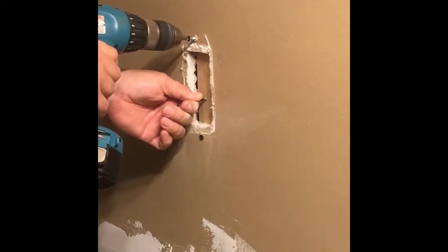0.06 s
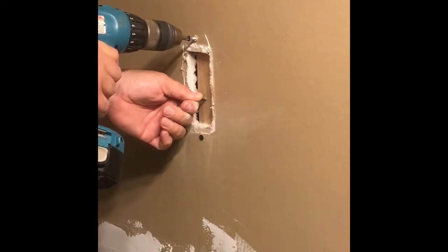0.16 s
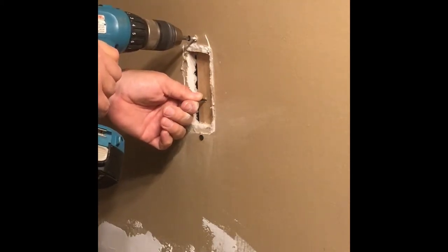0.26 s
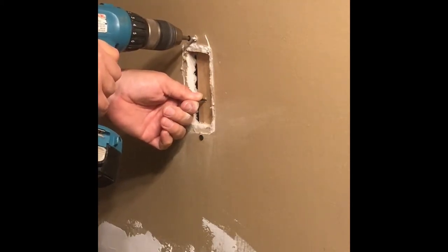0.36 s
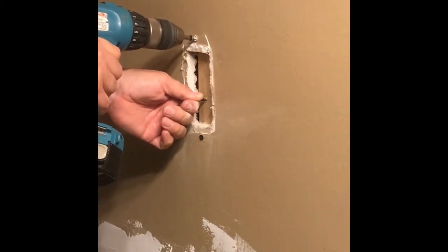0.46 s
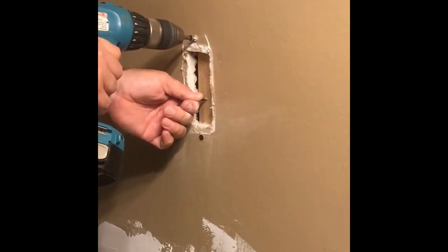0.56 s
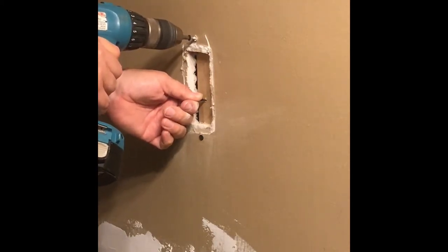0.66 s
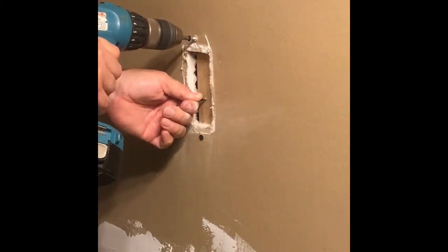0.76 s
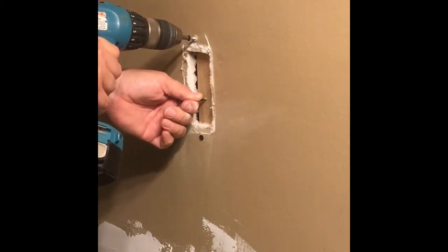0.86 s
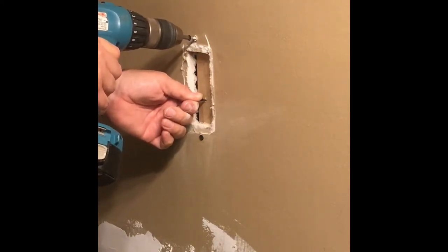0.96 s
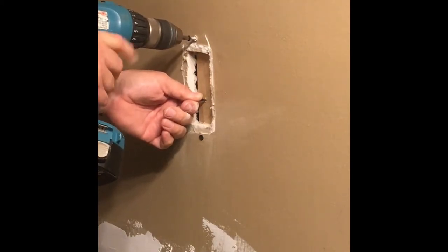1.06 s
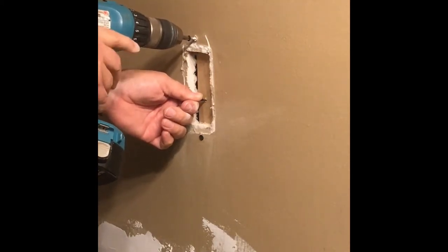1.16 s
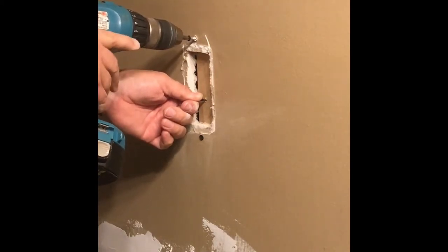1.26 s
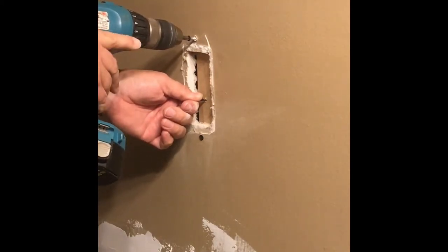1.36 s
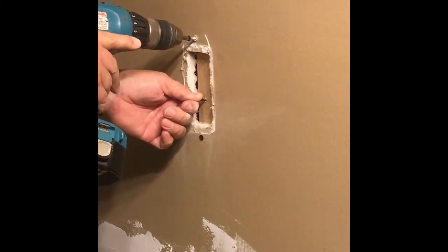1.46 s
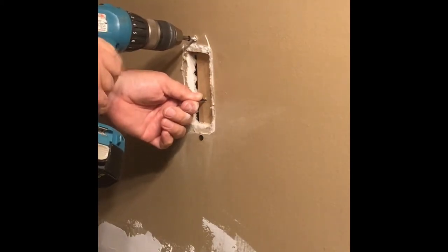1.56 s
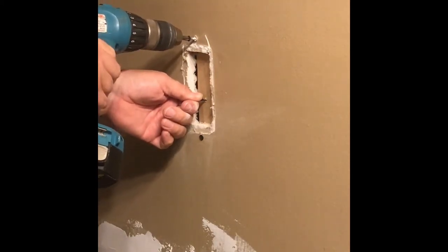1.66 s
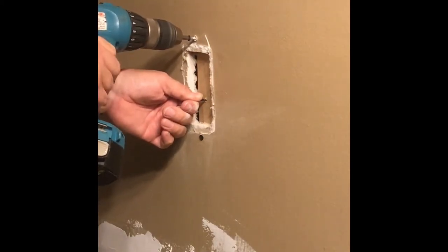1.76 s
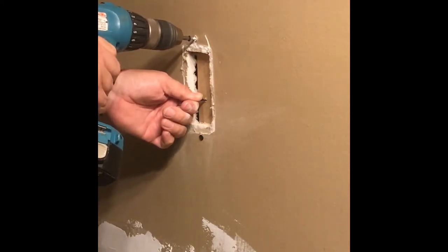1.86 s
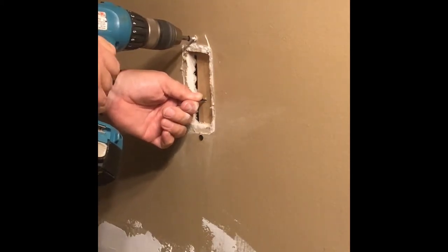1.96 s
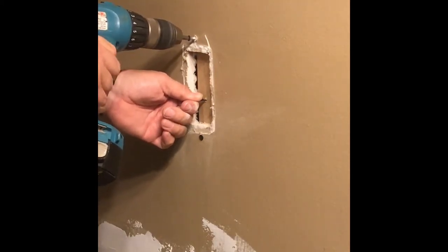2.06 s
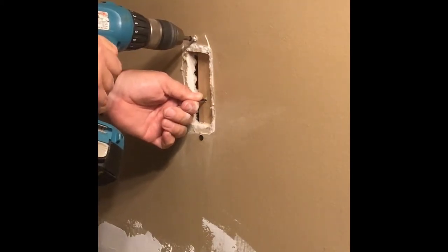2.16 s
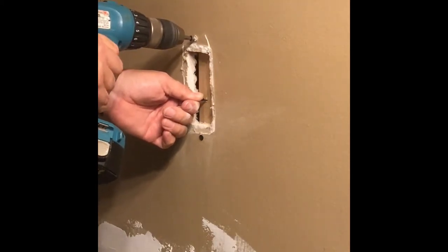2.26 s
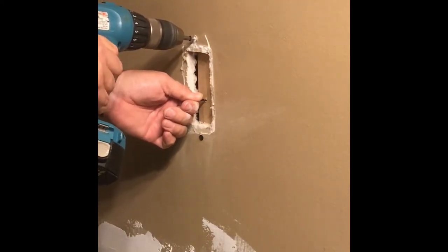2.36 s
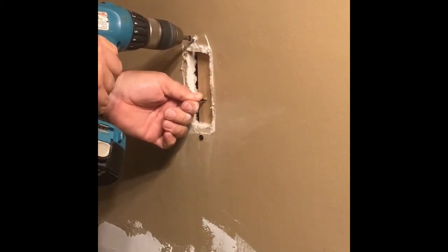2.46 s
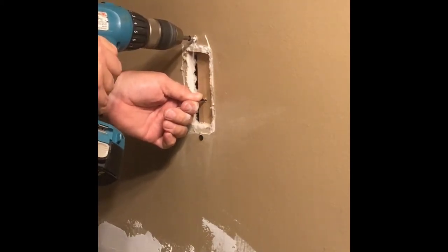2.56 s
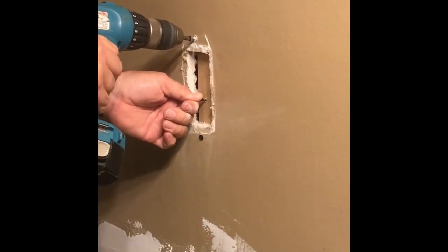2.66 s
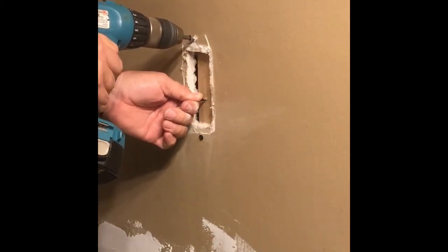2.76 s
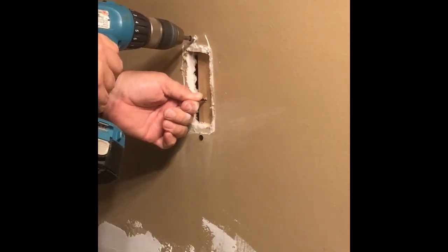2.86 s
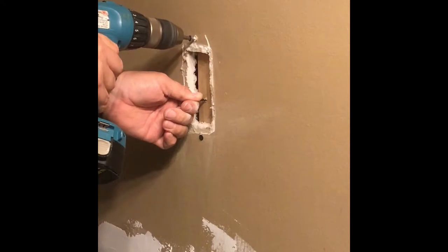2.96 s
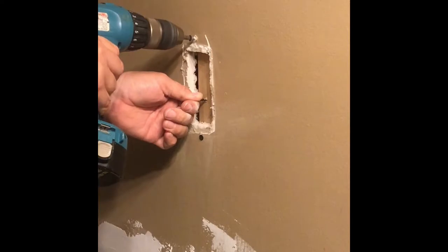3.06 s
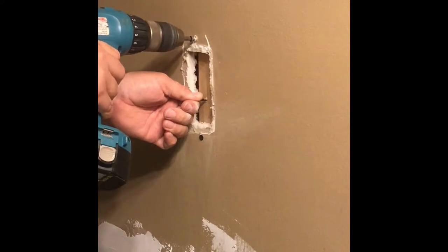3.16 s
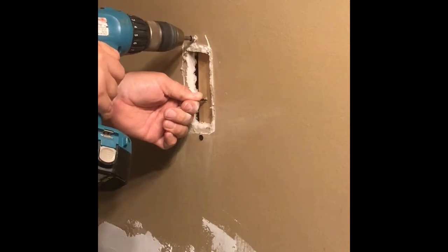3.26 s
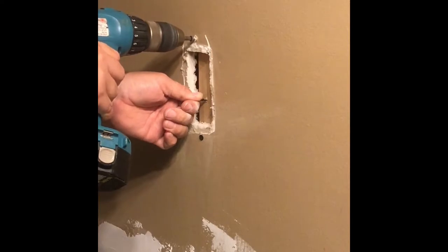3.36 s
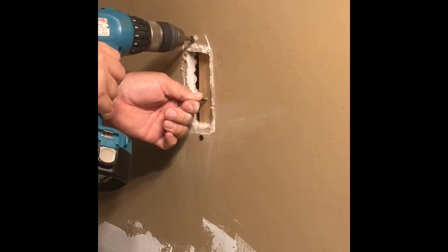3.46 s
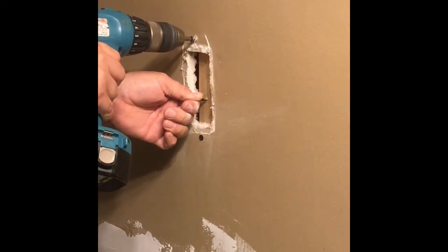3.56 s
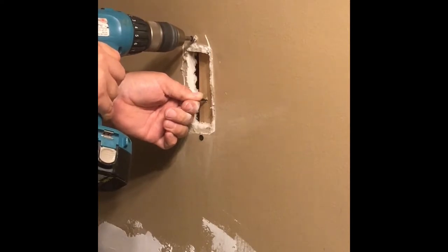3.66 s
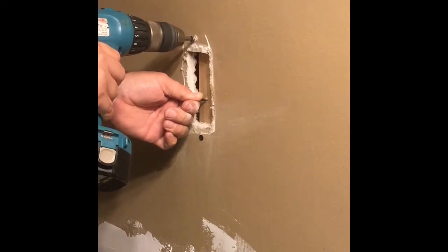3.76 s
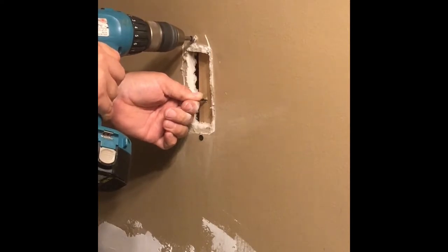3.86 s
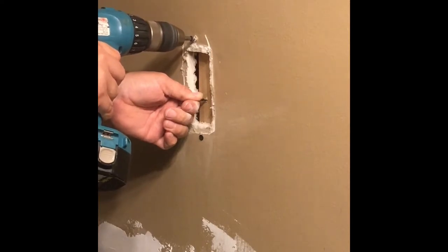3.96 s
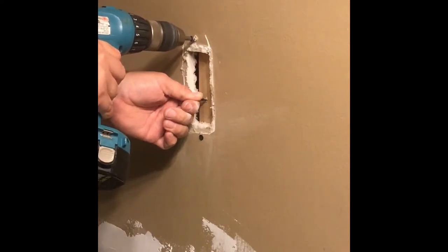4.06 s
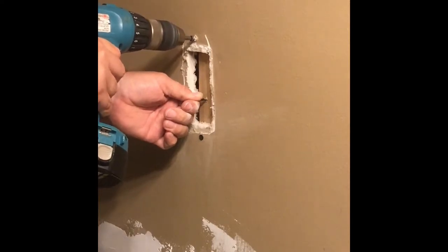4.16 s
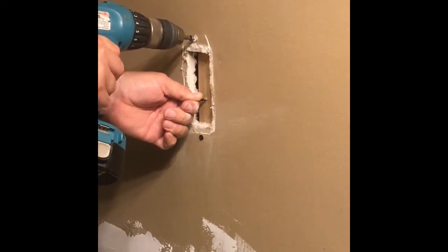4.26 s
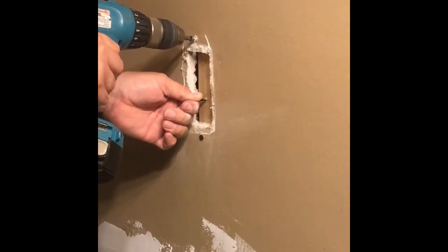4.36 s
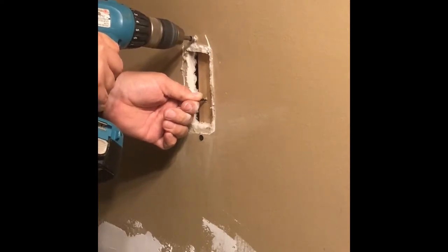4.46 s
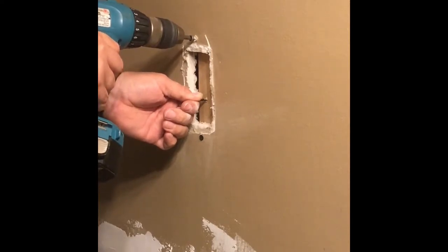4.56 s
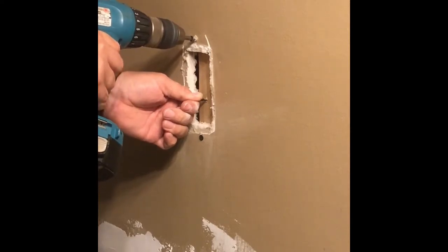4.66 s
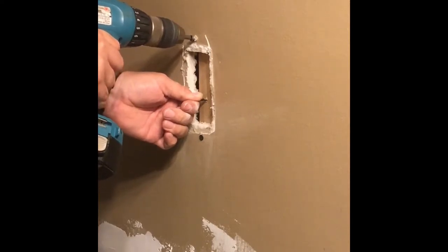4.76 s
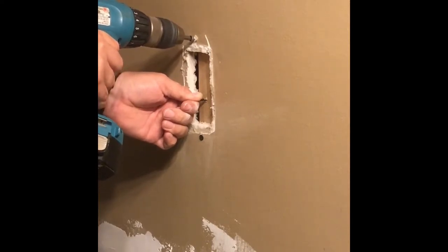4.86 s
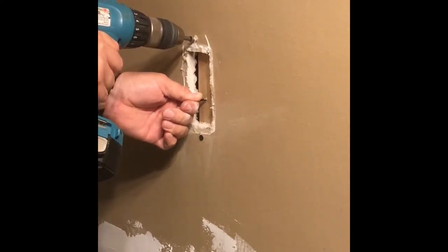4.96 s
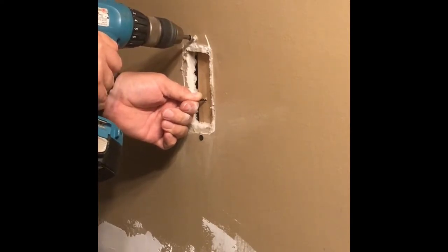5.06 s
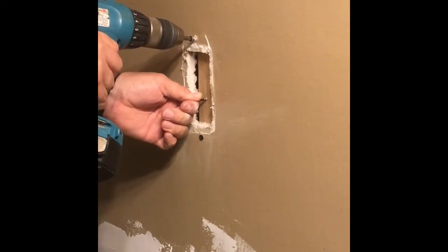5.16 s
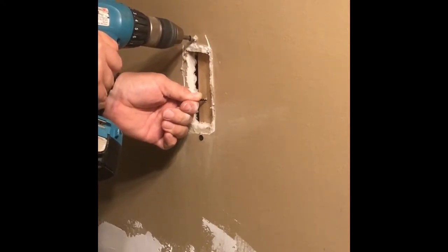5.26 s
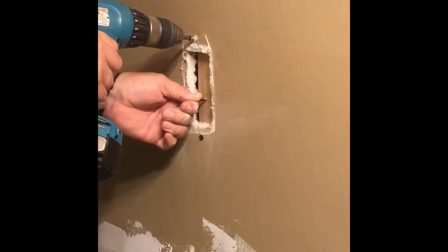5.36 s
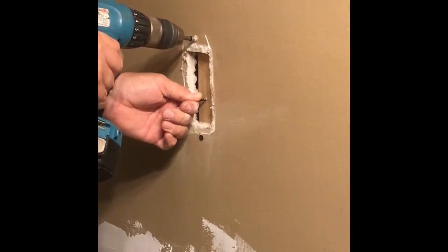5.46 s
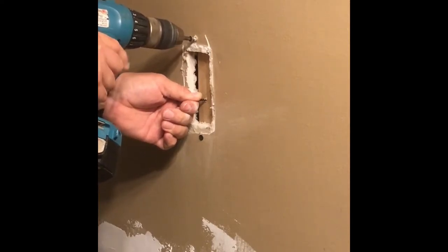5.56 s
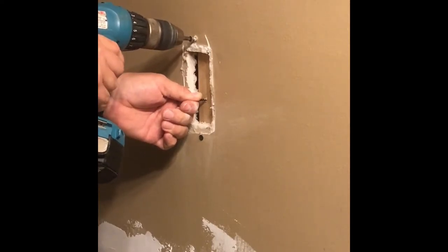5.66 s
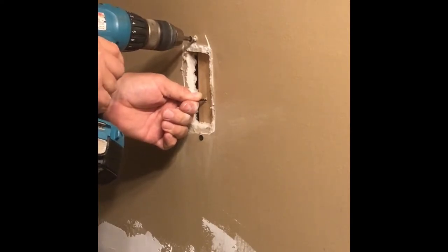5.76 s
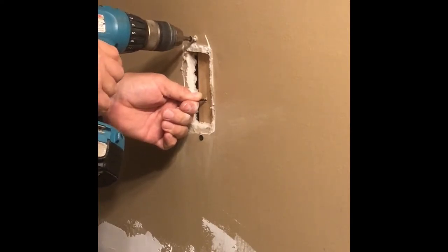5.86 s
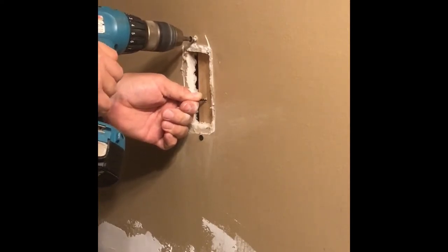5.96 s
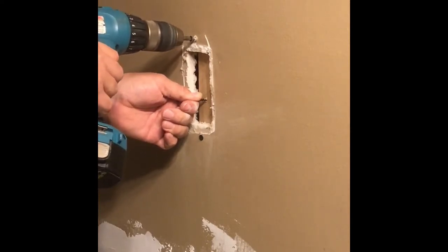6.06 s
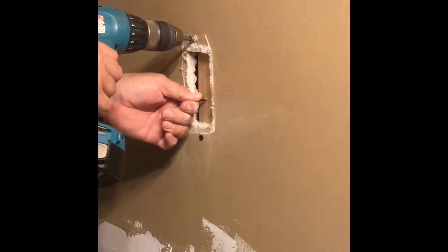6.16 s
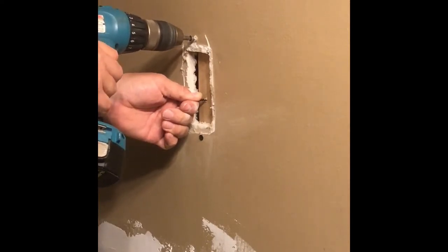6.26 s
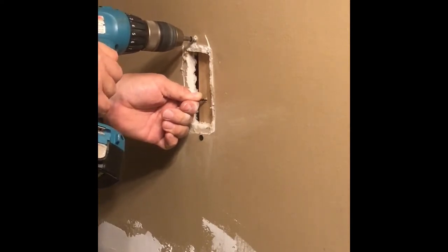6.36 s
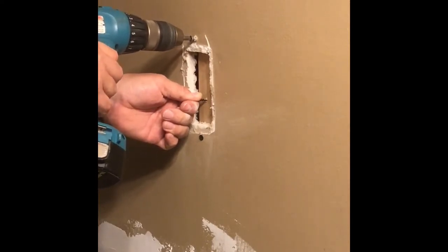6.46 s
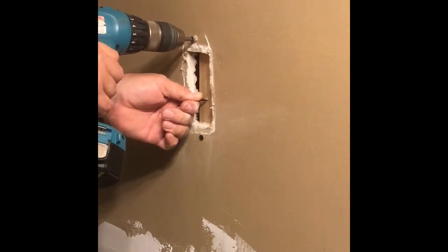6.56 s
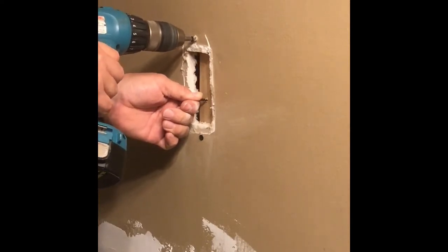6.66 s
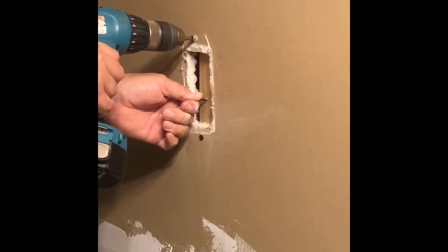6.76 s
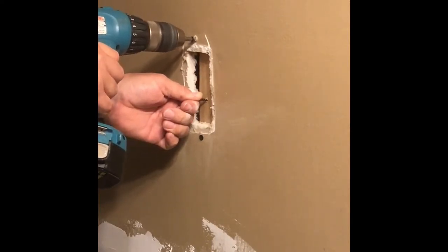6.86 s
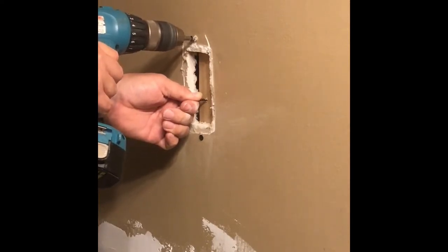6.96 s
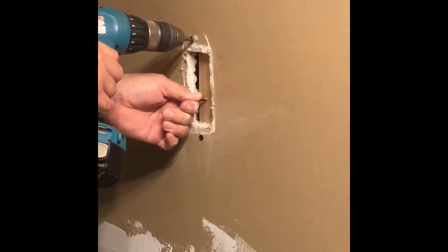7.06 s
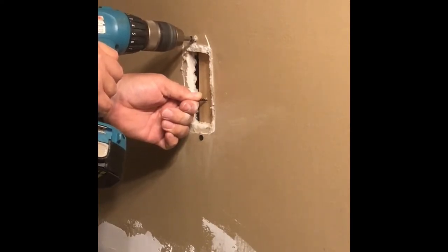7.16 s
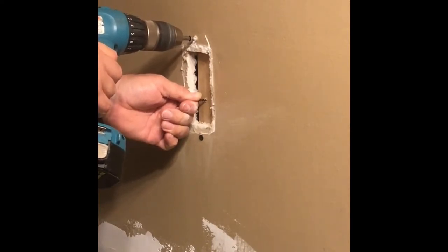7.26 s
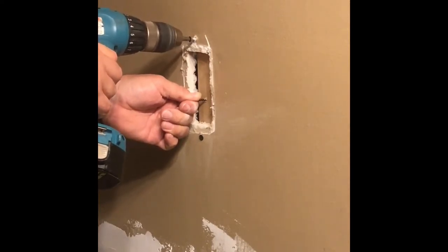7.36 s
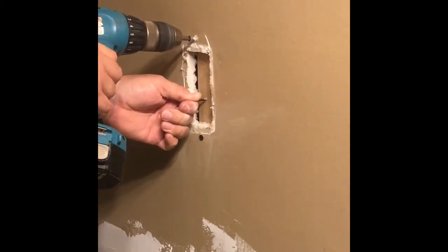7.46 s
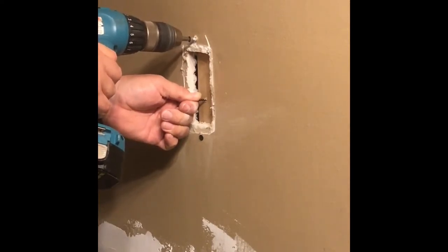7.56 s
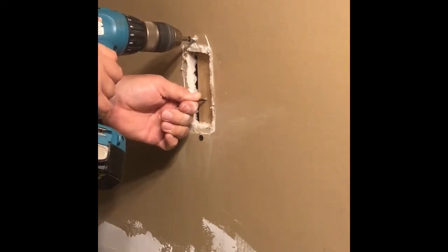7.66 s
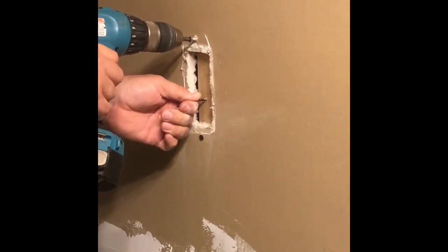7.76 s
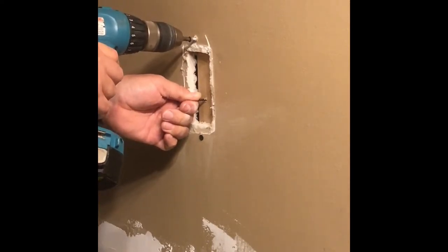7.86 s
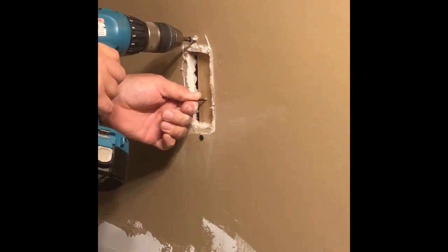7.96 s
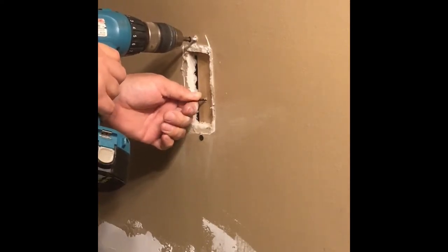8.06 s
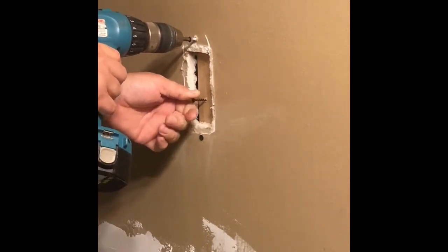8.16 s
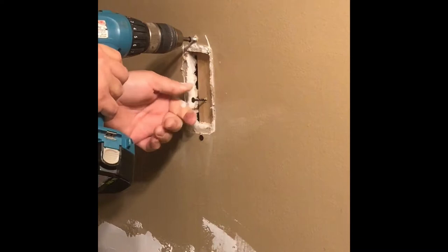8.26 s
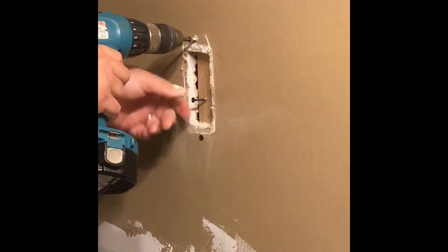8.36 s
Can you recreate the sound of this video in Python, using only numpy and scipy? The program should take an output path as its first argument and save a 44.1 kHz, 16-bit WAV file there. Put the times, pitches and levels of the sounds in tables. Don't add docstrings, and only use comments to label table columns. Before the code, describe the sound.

A cordless drill whines in three runs against a hollow plasterboard wall in a small tiled bathroom, with sharp switch clacks and panel thumps between.

```python
import sys
import numpy as np
from scipy import signal
from scipy.fft import rfft, irfft, next_fast_len
from scipy.io import wavfile
from scipy.ndimage import map_coordinates

SR = 44100
rng = np.random.default_rng(int(sys.argv[2]) if len(sys.argv) > 2 else 0)


def volts_from_db(level):
    exponent = np.asarray(level, float) / 20
    return 10 ** exponent


def store_wav(level_fs):
    pcm = np.round(np.clip(np.atleast_2d(level_fs), -1, 1) * 32767)
    wavfile.write(sys.argv[1], SR, pcm.T.astype(np.int16))


N = 370881

# freq_hz, level_db (per Hz)
AIR_COLOUR = [(12, -38.5), (20, -4), (44, -3), (68, 4), (162, -18), (276, -14.5), (539, -20.5), (891, -27),
              (1180, -22.5), (1890, -28.5), (5620, -34.5), (7440, -40.5), (15800, -42)]
# freq_hz, t60_s
ROOM_DECAY = [(100, 0.22), (1000, 0.37), (4000, 0.31), (10000, 0.26), (16000, 0.14)]
# start_s, low_hz
FLECKS = [(.641, 4700), (.641, 9000), (.92, 5100), (1.942, 14400), (2.545, 11700), (2.847, 7600),
          (3.706, 9600), (3.708, 4100), (3.937, 4100), (3.939, 8300), (3.939, 9600), (4.566, 7500),
          (4.659, 5600), (4.659, 8300), (4.937, 7500), (4.939, 5100), (6.795, 8200), (6.843, 8200),
          (6.957, 9000), (7.213, 4700), (7.214, 9600), (7.584, 4100), (7.586, 8200)]
FLECK_DB, FLECK_DB_PER_DECADE, FLECK_WIDTH_HZ = -42.5, -19, 1400

# start_s, length_s,
# boom_db, rumble_db
SHOVES = [(0, 0.023, -39.5, -49.5), (0.512, 0.054, -40, -38), (0.667, 0.18, -41.5, -52),
          (1.09, .12, -45, -50.5), (1.424, 0.056, -44, -56.5), (1.958, 0.35, -36, -40.5),
          (2.384, 0.42, -43.5, -44), (2.822, 0.29, -38.5, -43), (3.076, 0.25, -33.5, -40),
          (3.504, 0.26, -38, -45.5), (3.964, 0.51, -40, -43), (4.5, .28, -34.5, -40.5),
          (4.832, 0.23, -37.5, -36.5), (5.122, 0.33, -33, -35.5), (5.53, 0.079, -34.5, -39.5),
          (6.051, .1, -43, -52), (6.27, 0.41, -33, -40.5), (6.817, 0.24, -38.5, -38),
          (7.098, .5, -43.5, -43.5), (7.653, 0.25, -42.5, -43), (8.1, 0.33, -61, -60), (.2, 0.6, -71, -66),
          (1.72, 0.18, -56, -55.5), (5.8, 0.18, -61, -68.5)]
# freq_hz, level_db (per Hz)
RUMBLE_COLOUR = [(20, -19), (40, -5.5), (85, -7), (97, -4), (199, -5), (242, -12.5), (340, -11.5),
                 (450, -28.5), (700, -55.5)]
PANEL_MODES_HZ = [100.4, 134, 167.7, 197, 273]
MODE_WIDTH_HZ, MODE_LIFT = 13, 0.7
PANEL_HZ, PANEL_RISE_S, PANEL_T60_S = 68.4, 0.045, 0.45
RUMBLE_T60_S, THREAD_DB = 0.53, -17.5

# start_s, peak_db, length_s,
# centre_hz, width_hz
TICKS = [(.248, -49, .006, 1300, 1480), (.249, -72, 0.0043, 5250, 1500), (0.386, -39.5, 0.025, 1800, 2500),
         (.386, -36.5, 0.0026, 6250, 6048), (1.129, -29.5, .012, 2150, 2510),
         (1.313, -19.5, 0.0037, 3500, 8000), (1.408, -23, .006, 3260, 1200), (3.44, -36, 0.0066, 8000, 500),
         (1.629, -61, 0.00464, 5000, 6200), (1.704, -56, 0.0037, 1800, 892),
         (1.711, -57, 0.0032, 2900, 703), (1.72, -42.5, 0.0122, 1502, 700), (1.744, -45, .01, 1599, 800),
         (1.77, -61, 0.0048, 3000, 6010), (5.548, -22, 0.017, 1580, 2940),
         (6.033, -49.5, 0.016, 2014, 8940), (6.072, -48, 0.0044, 3993, 6000),
         (7.833, -21.5, 0.014, 1240, 2380), (8.187, -51, 0.0017, 5740, 897),
         (8.146, -60, 0.0015, 4500, 3000), (8.188, -55, .002, 890, 1394), (8.268, -49, .003, 1100, 700),
         (8.29, -58, 0.024, 1300, 800), (8.334, -61.5, 0.0051, 1210, 297)]
# start_s, peak_db, top_hz
CLACKS = [
    (1.3133, -19.5, 22000),
    (1.4086, -17.5, 4500),
]
# delay_s, level_db
CHATTER = [
    (0, 2.5),
    (.0006, 6),
    (.0015, -7),
    (.005, -6),
]
# freq_hz, width_hz, level_db
HOUSING = [(607, 500, -25), (1700, 360, -2), (2450, 700, -8), (3190, 530, 3), (4400, 520, 4.5),
           (5300, 950, -2.5), (6660, 1400, -2.5), (8500, 1180, -9.5), (11800, 1500, -23), (14000, 1400, -7)]
CLACK_LOW_HZ = 1300

# time_s, asked_speed_hz
PULLS = [
    [(.385, 40), (.418, 30), (.422, 178), (.58, 153), (.72, 149), (.86, 45), (1.04, 130), (1.075, 107),
     (1.135, 108)],
    [(1.774, 130), (1.81, 228), (1.9, 205), (2.3, 205.4), (3.15, 205.2), (3.33, 203.6), (4.4, 203.1),
     (4.75, 202.3), (5.56, 202.5)],
    [(6.058, 285), (6.13, 205), (6.4, 202.2), (6.9, 202.3), (7.4, 203.4), (7.838, 204)],
]
# time_s, screw_load (0 to 1), vent_tilt (-1 to 1, toward the microphone)
HAND = [(.6, 0, 0), (1.1, 0, 0), (2.12, 0.66, -0.43), (2.6, 0.06, .3), (3.1, 0, 0.095), (3.3, 0.7, -0.75),
        (3.65, .7, 0.25), (4.0, 0.84, 1), (4.35, 0.8, 0.94), (4.7, 0.38, 0.24), (5.05, 0.6, -1),
        (5.4, 0.5, 0.077), (6.4, 1, -0.1), (6.85, 0.94, -0.76), (7.1, 1, 0.16), (7.35, 1, 0.16),
        (7.7, 0.83, 0.098)]
MAIN_ORDERS = [7, 10.39, 20.16, 26, 28, 30.3, 35]
# part_throttle_db, full_speed_db, db_per_load, db_per_tilt
MAIN_LEVELS = [(-48, -52, 11.5, -0.9), (-44, -44.5, 0, -7.5), (-43.5, -64, 17, -3),
               (-56.5, -46.5, -2.5, 6.5), (-60, -48.5, 5, 4), (-47, -59, .1, -0.5), (-51, -47.5, 3, .1)]
# multiple, level_db
MINOR_ORDERS = [(8, -56), (10.76, -52), (11.03, -53), (14, -49), (16, -54), (18, -55), (21, -51), (23, -56),
                (25, -54), (29, -51), (30, -56), (36, -54), (40, -62), (43, -64), (48, -62), (49, -59),
                (53, -65), (56, -62), (57, -63), (61, -64), (64, -61), (65, -61), (69, -61), (70, -60),
                (77, -59)]
# freq_hz, level_db (per Hz)
WHIRR_COLOUR = [(210, -57), (350, -21.5), (433, -12.5), (810, -15), (1050, -5.5), (1330, -7), (1390, -5),
                (1880, -8.5), (2160, -2), (2640, -4.5), (2880, -1), (4870, -4.5), (5460, -3), (7050, -5.5),
                (10500, -15.5), (13600, -35), (22000, -120)]
# freq_hz, level_db (per Hz)
HISS_COLOUR = [(7000, -33), (9500, -3), (10600, -13), (12000, 0.5), (14200, -5), (15300, 4.5), (15800, -9)]
# freq_hz, level_db (per Hz)
GROWL_COLOUR = [(200, -16), (450, -9.5), (1200, -1.5), (1800, -0.5), (3500, -37)]
SPIN_UP_S, FULL_HZ = .08, 203
GEARS_SETTLE_HZ = 165
WHIRR_DB, WHIRR_DB_PER_DECADE = -29, 15
STRAIN_DB, LOAD_DB = 2, 0.33
HISS_DB, HISS_DB_PER_DECADE = -9, 17
DRIFT_DB, COAST_DB, SMEAR_DB = 0.8, -90, -11
VENT_HZ, VENT_DB_PER_OCTAVE = 1500, 14
NOTCH_HZ, NOTCH_WIDTH_HZ, NOTCH_DB = 1800, 170, -9


def unit(x):
    return x / np.sqrt(np.mean(x ** 2) + 1e-20)


def along(points, hz):
    f, v = np.transpose(points)
    return np.interp(np.log(hz + 1), np.log(f + 1), v)


def curves(rows):
    s, *cols = np.transpose(rows)
    return [np.interp(np.arange(N) / SR, s, c) for c in cols]


def wobble(rate):
    knots = rng.standard_normal(int(N * rate / SR) + 4)
    return map_coordinates(knots, [np.arange(N) * rate / SR])


def filtered(x, response):
    m = next_fast_len(N + SR // 2)
    return irfft(rfft(x, m) * response(np.fft.rfftfreq(m, 1 / SR)), m)[..., :N]


def noise(colour, drive=1):
    return unit(filtered(drive * rng.standard_normal(N), lambda hz: volts_from_db(along(colour, hz))))


def resonance(f, hz, width_hz):
    return 1j * f * width_hz / (hz * hz - f * f + 1j * f * width_hz)


def room_air():
    return volts_from_db(-58.5) * noise(AIR_COLOUR)


def bathroom(x, count=5):
    hz, t, z = signal.stft(rng.standard_normal((count + 1, SR // 2)), SR, nperseg=256)
    fade = volts_from_db(-60 * t / along(ROOM_DECAY, hz)[:, None])
    tails = signal.istft(z * fade, SR, nperseg=256)[1]
    place = (np.arange(N) / SR / .11 - np.arange(count)[:, None]) % count
    shares = np.sin(np.pi * np.clip(place / 2, 0, 1))
    echoes = tails[1:] / np.linalg.norm(tails[1])
    wet = signal.fftconvolve(shares * x, echoes, axes=1).sum(0)
    earlier = filtered(np.pad(tails[0], (0, N))[:N], lambda f: volts_from_db(along(WHIRR_COLOUR, f)))
    return volts_from_db(-5.5) * np.pad(wet, (150, 0))[:N] + volts_from_db(-41.5) * earlier


def treble_flecks():
    side = np.zeros(N + SR)
    f = np.fft.rfftfreq(2048, 1 / SR)
    window = signal.windows.kaiser_bessel_derived(2048, 4 * np.pi)
    for s, low in FLECKS:
        db = FLECK_DB + FLECK_DB_PER_DECADE * np.log10(low / 4500)
        inside = (f > low) * (f < low + FLECK_WIDTH_HZ)
        band = irfft(rfft(rng.standard_normal(2048)) * inside)
        side[round(s * SR) - 1024:][:2048] += volts_from_db(db) * unit(band) * window
    return side[:N] * np.array([[1], [-1]])


def swells(levels_db, t60):
    t = np.arange(N) / SR
    energy = 0
    for (s, length, *_), db in zip(SHOVES, levels_db):
        rise = np.clip((t - s) / PANEL_RISE_S + .5, 0, 1)
        ring_out = volts_from_db(-60 * np.clip(t - s - length, 0, None) / t60)
        energy = energy + (volts_from_db(db) * rise * ring_out) ** 2
    return np.sqrt(energy)


def wall():
    _, _, boom_db, rumble_db = np.transpose(SHOVES)
    boom = np.sin(2 * np.pi * np.cumsum(PANEL_HZ + 1.63 * wobble(14)) / SR)
    boom = boom * volts_from_db(2.5 + 0.8 * wobble(9)) * swells(boom_db, PANEL_T60_S)
    thread = power(.05) * volts_from_db(whirr_level() + THREAD_DB)
    bite = np.hypot(swells(rumble_db, RUMBLE_T60_S), thread)
    lumps = noise(RUMBLE_COLOUR, volts_from_db(1.9 * wobble(60) + 2.1 * wobble(12)))

    def panel(f):
        return 1 + MODE_LIFT * sum(resonance(f, hz, MODE_WIDTH_HZ) for hz in PANEL_MODES_HZ)

    return boom + bite * unit(filtered(lumps, panel))


def burst(s, db, length):
    u = np.arange(SR // 8) / SR / np.clip(length, .0003, .03)
    puff = volts_from_db(db) * np.sqrt(u) * np.exp(1 - u / 2) * rng.standard_normal(len(u))
    return np.pad(puff, (round(s * SR), N))[:N]


def small_knocks():
    return sum(filtered(volts_from_db(-3.5) * burst(s, db, length / 2), lambda f: resonance(f, hz, w))
               for s, db, length, hz, w in TICKS)


def switch_clacks():
    def housing(f):
        return sum((-1) ** k * volts_from_db(db) * resonance(f, hz, w) for k, (hz, w, db) in enumerate(HOUSING))

    def blows(f):
        return sum(volts_from_db(db + less_db + 23.5) * np.exp(-2j * np.pi * f * (s + late)) / (1 + 1j * f / top) ** 2
                   for s, db, top in CLACKS for late, less_db in CHATTER)

    impulse = 1. * (np.arange(N) == 0)
    return filtered(impulse, lambda f: blows(f) * housing(f) / (1 + CLACK_LOW_HZ / (1j * f + 1)) ** 2)


def rotor():
    t = np.arange(N) / SR
    asked, = curves(np.vstack(PULLS))
    asked = asked * sum((t >= run[0][0]) * (t < run[-1][0] + .15) for run in PULLS)
    keep = np.exp(-1 / (SPIN_UP_S * SR))
    speed = np.maximum(signal.lfilter([1 - keep], [1, -keep], asked), 1)
    return speed, (asked - speed) / FULL_HZ


def power(brake_s):
    t = np.arange(N) / SR
    return sum(np.clip((t - run[0][0]) / 0.0038, 0, 1) * np.exp(-np.clip(t - run[-1][0], 0, None) / brake_s)
               for run in PULLS)


def whirr_level():
    (speed, strain), load = rotor(), curves(HAND)[0]
    speed_db = WHIRR_DB_PER_DECADE * np.log10(speed / FULL_HZ)
    return WHIRR_DB + speed_db + STRAIN_DB * np.clip(strain, 0, 1) + LOAD_DB * load


def main_tone_levels(speed, strain):
    load, tilt = curves(HAND)
    full = np.clip((speed - GEARS_SETTLE_HZ) / (FULL_HZ - 5 - GEARS_SETTLE_HZ), 0, 1)
    grip_db = COAST_DB * np.clip(-strain, 0, 1) + SMEAR_DB * np.clip(strain, 0, 1)
    levels = []
    for k, (part_db, full_db, load_db, tilt_db) in zip(MAIN_ORDERS, MAIN_LEVELS):
        pitch = k * speed
        settled_db = full_db + load * load_db + tilt * tilt_db
        db = part_db + full * (settled_db - part_db) + grip_db
        db += (1 - full) * VENT_DB_PER_OCTAVE * np.log2(np.clip(pitch / VENT_HZ, 0, 1))
        db += NOTCH_DB * np.exp(-((pitch - NOTCH_HZ) / NOTCH_WIDTH_HZ) ** 2)
        levels.append(db + DRIFT_DB * wobble(2.86))
    return levels


def motor(brake_s=.03, gate=0.18, flutter_db=2.0):
    (speed, strain), whirr_db, on = rotor(), whirr_level(), power(brake_s)
    looseness = np.clip(1 - speed / 200, 0, 1)
    slack = 1 + 1.5 * looseness
    jitter = 1 + .0004 * wobble(25) + .05 * looseness * wobble(70)
    slowing = np.clip(on, 0, 1) ** .5
    turn = 2 * np.pi * np.cumsum(speed * slowing * jitter) / SR

    tones = 0
    for k, db in zip(MAIN_ORDERS, main_tone_levels(speed, strain)):
        flutter = flutter_db * slack ** 2.0 * wobble(30)
        tones = tones + volts_from_db(db + 5.0 - 0.98 * slack + flutter) * np.sin(k * turn)
    minor = sum(volts_from_db(db + 3 * wobble(4)) * np.sin(k * turn + k) for k, db in MINOR_ORDERS)
    tones += volts_from_db(whirr_db + 32.5) * (speed / 203) ** 3 * minor
    tones *= np.clip(speed / 100, 0, 1) ** 2

    beat = 1 + gate * np.cos(turn) + 0.088 * np.cos(turn / 11.0)
    hiss_db = HISS_DB + HISS_DB_PER_DECADE * np.log10(speed / FULL_HZ)
    rush = noise(WHIRR_COLOUR, beat * volts_from_db(0.77 * wobble(40)))
    rush += on * volts_from_db(hiss_db) * noise(HISS_COLOUR, beat * volts_from_db(0.62 * wobble(60)))
    rush += 0.63 * (slack - 1) * noise(GROWL_COLOUR)
    return on ** 2 * tones, on * volts_from_db(whirr_db - 1.28) * rush


def scene():
    tones, rush = motor()
    knocks = switch_clacks() + small_knocks()
    near = volts_from_db(0.23) * tones + volts_from_db(-1.0) * rush + knocks
    far = volts_from_db(-13) * tones + volts_from_db(-3.5) * rush + volts_from_db(0.5) * knocks
    return np.tile(near + bathroom(far) + wall() + room_air(), (2, 1))


def roll_off(x):
    return signal.sosfilt(signal.butter(12, 16830, fs=SR, output="sos"), x)


def record(dry):
    mix = filtered(dry + treble_flecks(), lambda hz: hz < 15790)
    return roll_off(mix)


dry = scene()
out = record(dry)
store_wav(out)
```